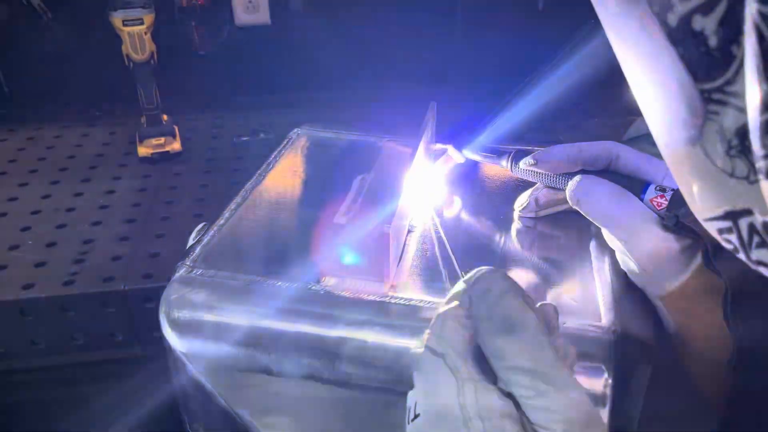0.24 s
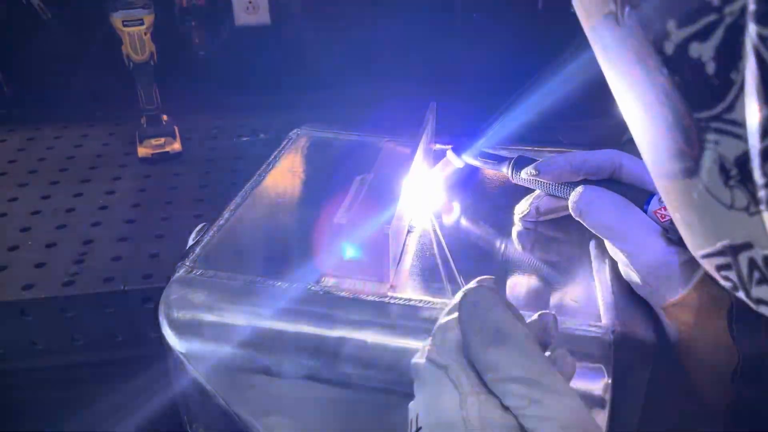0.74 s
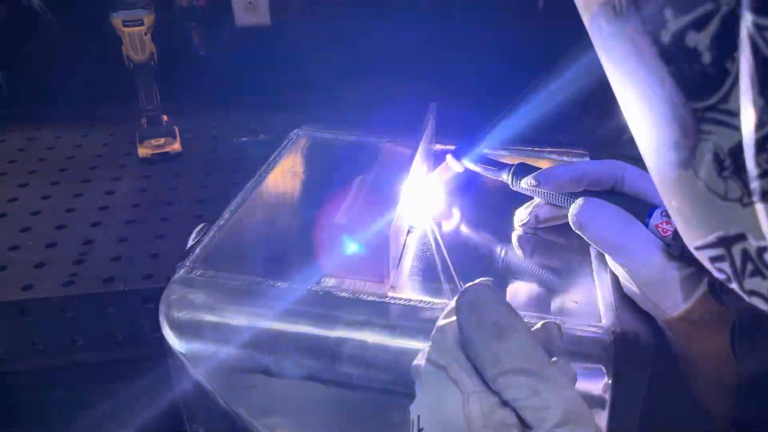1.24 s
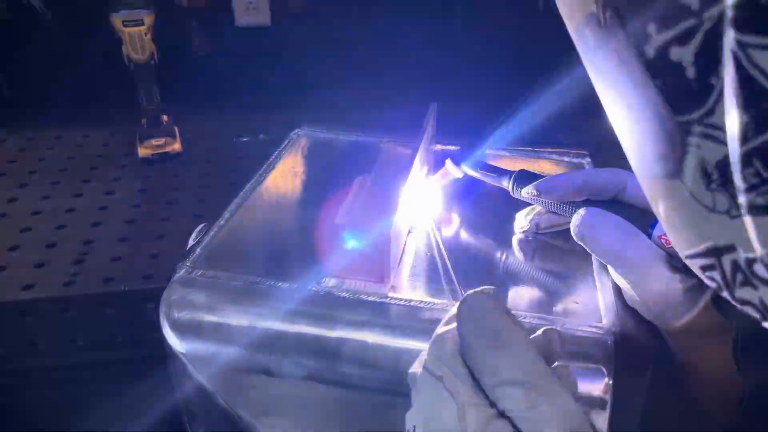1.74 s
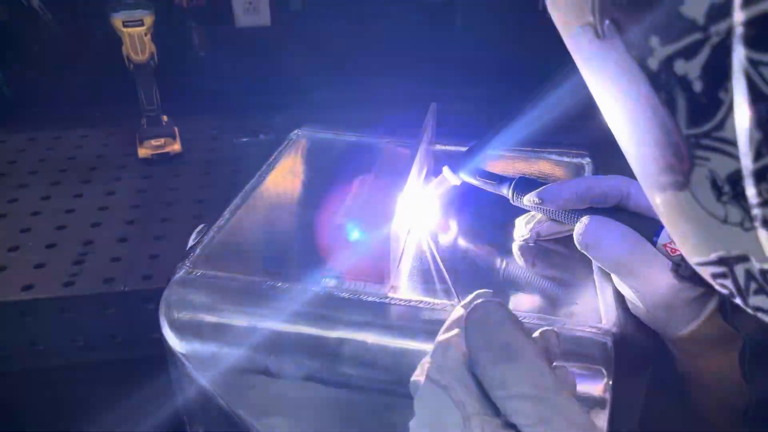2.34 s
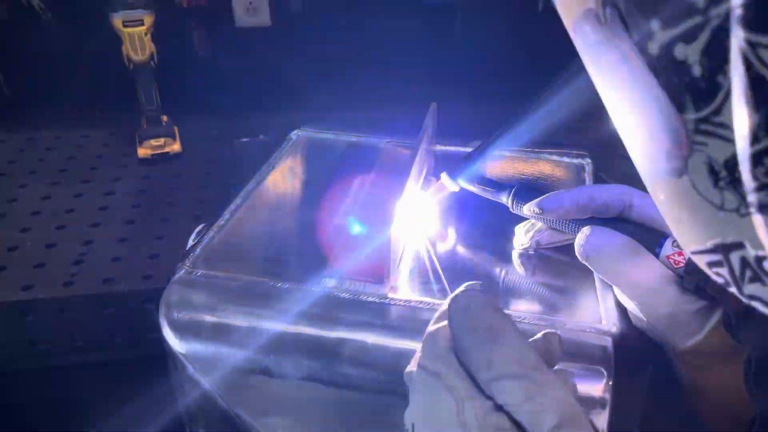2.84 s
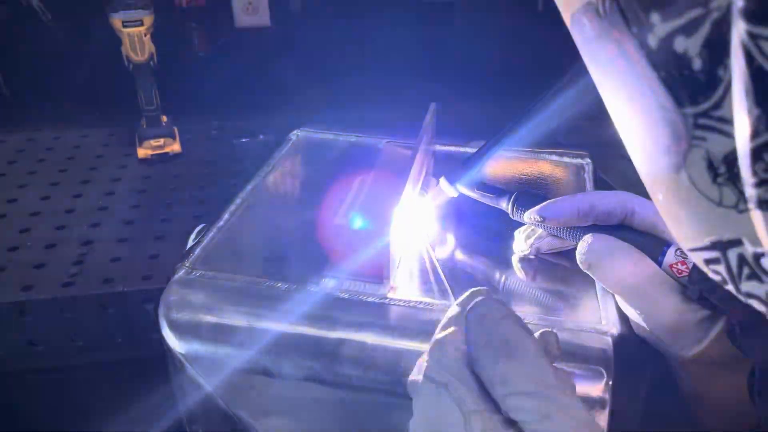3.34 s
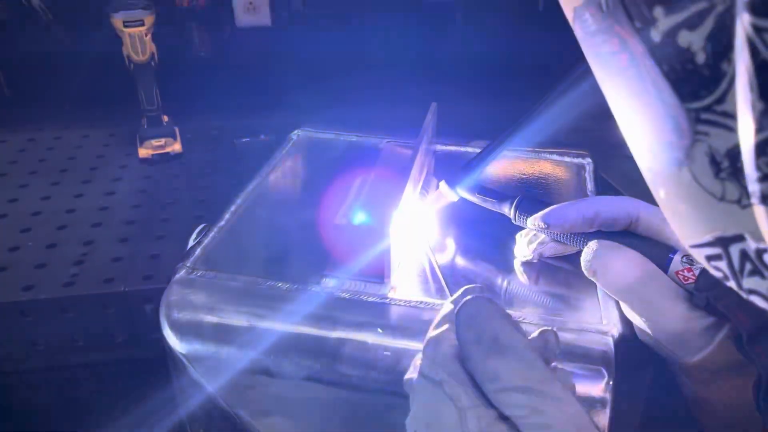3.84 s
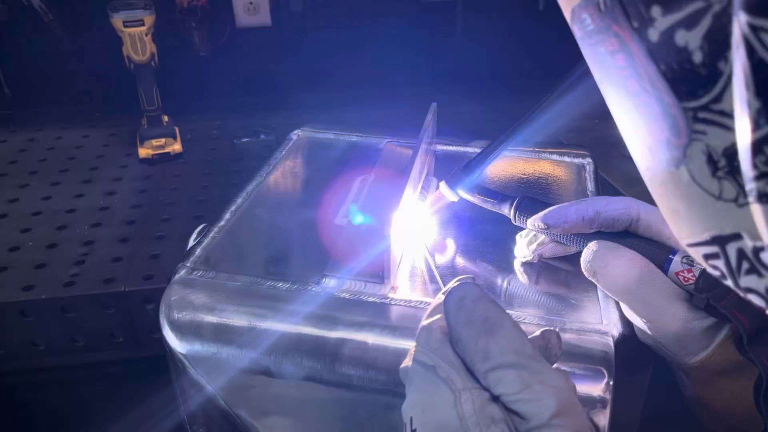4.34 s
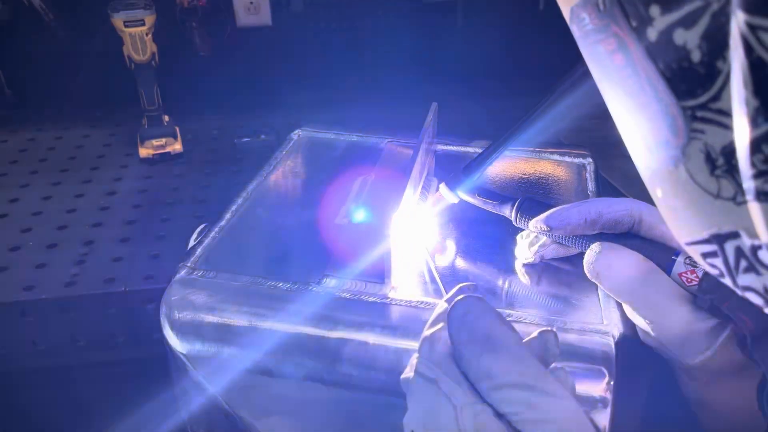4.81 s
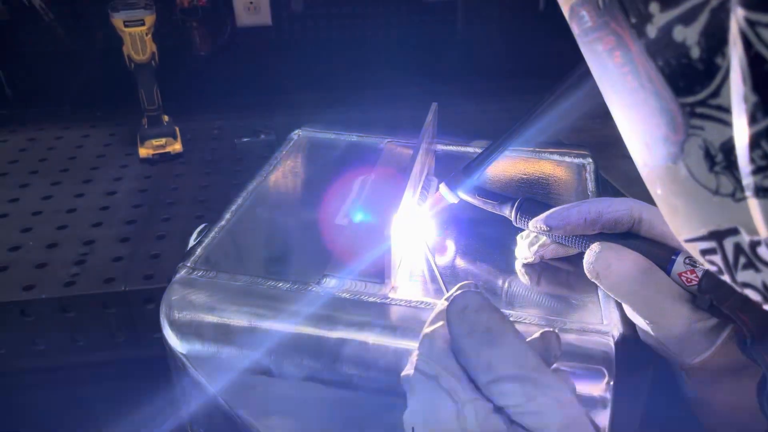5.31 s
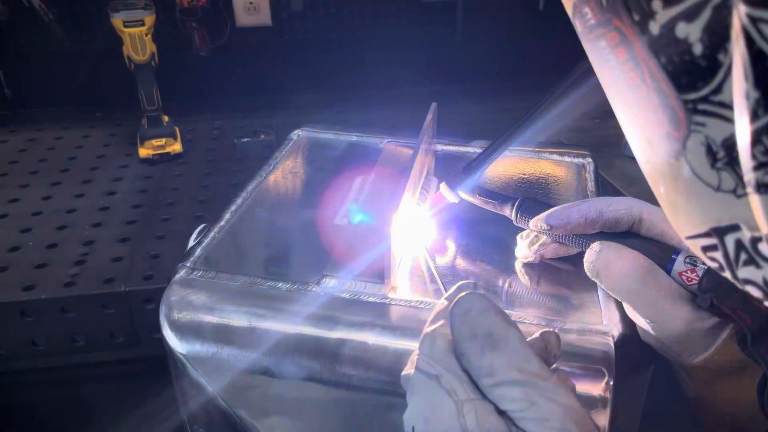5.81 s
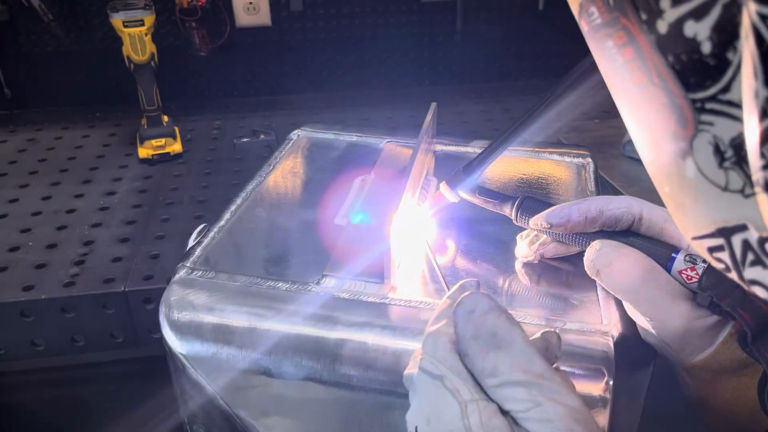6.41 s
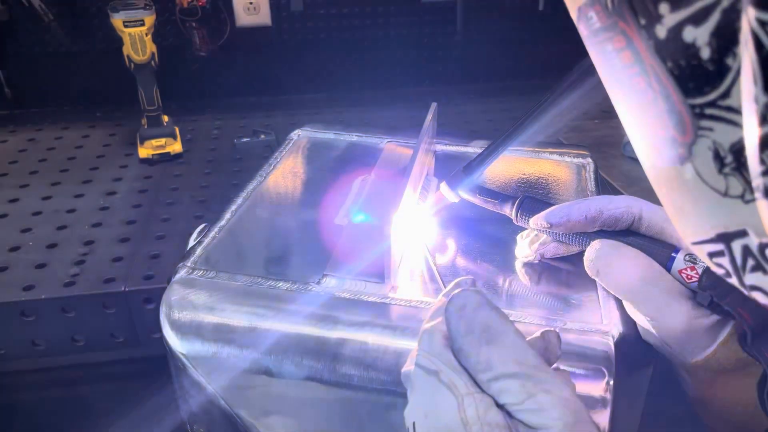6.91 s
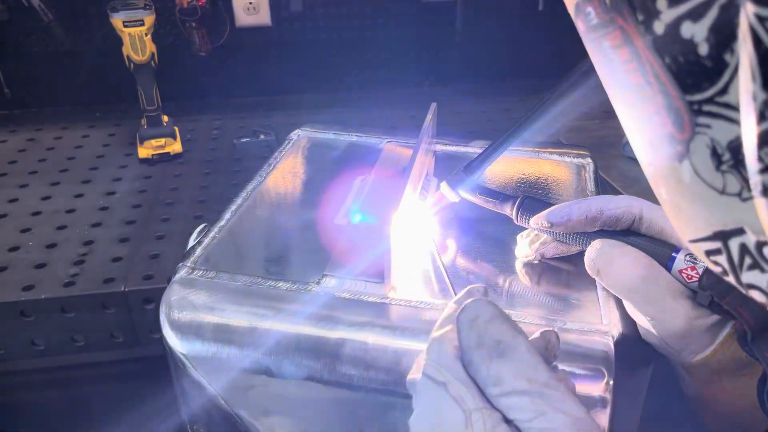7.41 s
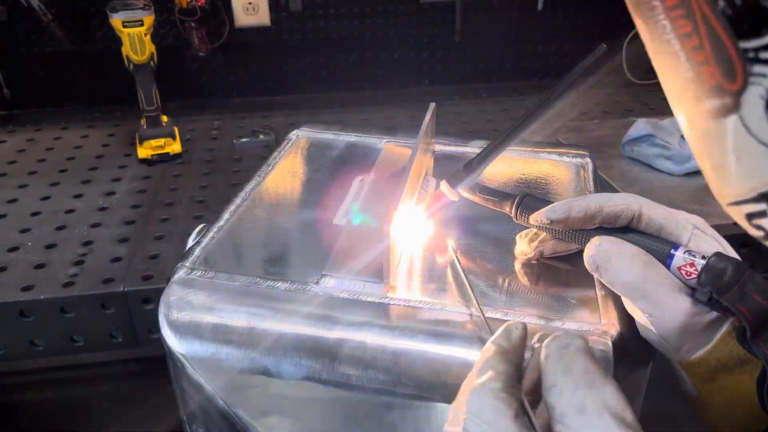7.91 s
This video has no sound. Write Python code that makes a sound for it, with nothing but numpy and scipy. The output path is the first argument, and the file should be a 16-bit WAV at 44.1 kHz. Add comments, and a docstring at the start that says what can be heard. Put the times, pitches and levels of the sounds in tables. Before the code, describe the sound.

Close to the microphone in a workshop, a welding arc gives a tight, bright, continuous buzz, sped up like a time-lapse, with a quick pulsing ripple. Almost halfway through it suddenly becomes a slower, louder, rasping buzz with metallic ring and hiss. Later it grows uneven, with crackles, hollow pops and a low airy roar, then collapses into dull thumps and thin pips over fan and gas noise.

```python
"""You hear a welding arc, close up: a fast buzz, then a slower, harsher one that sputters and dies away.
The arc welds an aluminium box in a workshop on alternating current. Twice a cycle the current reverses
and the arc snaps (a pressure step, coloured by the box); between the snaps it hisses (coloured noise).
The first stretch runs seven times faster, like a time-lapse; the rest is at natural speed.
Dull thumps, hollow pops and thin pips come late; fans, gas flow, machine tones and a roar lie behind."""
import sys
import numpy as np
from scipy import signal
from scipy.fft import rfft, irfft, next_fast_len
from scipy.io import wavfile
from scipy.ndimage import uniform_filter1d

SR = 44100
rng = np.random.default_rng(int(sys.argv[2]) if len(sys.argv) > 2 else 0)


def pcm_store(signal):
    """Save signal as 16-bit PCM."""
    levels = np.round(np.clip(np.atleast_2d(signal), -1, 1) * 32767)
    wavfile.write(sys.argv[1], SR, levels.astype(np.int16).T)


N = 359856
T = np.arange(N) / SR  # time of each sample, s

# Levels of the fast arc before the rod's dabs ripple them. Each row: start in seconds, then in dB
# the lead snap, the hiss, the crack of the main snap, its ring in the box, its hum.
FAST_LEVELS = [(0, -31, -43, -29, -38.5, -66), (.6, -34, -42.5, -27.5, -40, -68.5),
               (1.3, -37, -41.5, -28, -41, -62), (1.7, -39, -42, -29.5, -42, -62),
               (1.95, -35, -41.5, -29, -41.5, -67), (2.5, -39, -41, -29.5, -39.5, -58),
               (3.761, -36.5, -41, -30, -40, -58.5)]
# Levels of the arc at natural speed. Each row: the same columns as for the fast arc.
SLOW_LEVELS = [(3.765, -32, -35, -30.5, -39, -58), (3.8, -28.5, -34, -24, -29.5, -59),
               (4.3, -25, -34, -24, -30.5, -57.5), (4.7, -27, -31.5, -23, -28.5, -55),
               (5.1, -26, -32, -24.5, -30.5, -57), (5.45, -23.5, -32, -23, -28.5, -56),
               (5.8, -27.5, -30.5, -24, -33, -69), (6.1, -28.5, -27.5, -27, -36.5, -73),
               (6.4, -32.5, -33.5, -25, -36.5, -76), (6.65, -29, -30, -26.5, -34, -69),
               (6.9, -28.5, -29.5, -26, -32.5, -64), (7.3, -26, -33, -24.5, -31, -69),
               (7.55, -25.5, -28.5, -26, -29, -60), (7.7, -36.5, -28, -28.5, -41.5, -68),
               (7.88, -34.5, -37, -35, -36, -70), (8.0, -36, -41, -45, -44, -68),
               (8.104, -38, -42, -35, -35, -76)]
# How box and room colour the fast arc. Each row: multiple of the cycle rate, level in dB.
FAST_BOX_COLOUR = [(1, -17), (2, -16), (3, -16.5), (4, -24.8), (5, -10.5), (6, -10.5), (7, -14), (8, -21.5),
                   (9, -12.5), (10, -16), (11, -10.1), (12, -15.5), (13, -15), (14, -13), (15, -7.5),
                   (16, -14), (17, -15.5), (18, -11.5), (19, -8), (20, -2.5), (21, -5.5), (22, -0.5),
                   (23, 3.5), (24, 1), (25, -0.5), (26, 1.5), (27, 1.5), (28, 6.5), (29, 2.5), (30, -2),
                   (31, -1), (32, 6), (33, -4), (34, -4)]
# How they colour the arc at natural speed. Each row: multiple of the cycle rate, level in dB.
SLOW_BOX_COLOUR = [(1, -29), (2, -15.5), (3, -16), (4, -20), (5, -9), (6, -10), (7, -15.5), (8, -22.5),
                   (9, -11), (10, -16.5), (11, -13), (12, -21), (13, -14), (14, -16.5), (15, -10),
                   (16, -21.5), (17, -10), (18, -11.5), (19, -8), (20, -3), (21, -5.5), (22, -2), (23, 1.5),
                   (24, -1), (25, 0), (26, 1), (27, -3), (28, 3), (29, -2), (30, -1), (31, 1), (32, 3.5),
                   (33, 1.5), (34, 3.5), (35, -1.5), (36, 0)]
# Colour of the snaps above those multiples. Each row: frequency in Hz, level in dB.
CRACK_COLOUR = [(2500, -3), (2900, -6), (3300, -15.5), (4000, -10), (5500, -14), (6200, -9.5), (7000, -6.5),
                (8000, -9.5), (9000, -9), (10700, -16.5), (11600, -28), (12500, -27), (14000, -23),
                (15800, -37)]
# Colour of the lead snap on top of the main snap's. Each row: frequency in Hz at natural speed, dB.
LEAD_COLOUR = [(300, -31), (800, -13), (1200, -2.5), (2000, -6.5), (3000, -5.5), (4500, -2.5), (7000, 3.5),
               (8500, 6), (10000, 3.5), (12500, 8), (15800, 4)]
# Colour of the hiss. Each row: frequency in Hz at natural speed, level in dB.
HISS_COLOUR = [(60, -25.5), (300, -9.5), (900, -14), (2000, -2), (3200, -14), (4200, -6.5), (5300, -1.5),
               (6600, 2), (8000, -5.5), (10000, -4), (12000, -19), (15800, -25)]
# Steady gas fizz that follows the hiss level. Each row: frequency in Hz at natural speed, dB before a lift.
FIZZ_COLOUR = [(300, -33.5), (2000, -7), (6000, -13.5), (10000, -27), (13000, -18), (15800, -26)]
# Echoes off box walls and table top. Each row: delay in seconds at natural speed, level in dB,
# signed factor that multiplies it.
WALL_ECHOES = [(.0013, -24.5, 0.66), (.0022, -24, -0.89), (.0036, -37, -0.37), (.0055, -26.5, -0.00046),
               (.0063, -27, -1), (.0076, -16.5, 0.46), (.0091, -28.5, -1.16)]
# How unsteady the arc is. Each row: time in seconds, factor on the scatter of the snaps.
UNSTEADINESS = [(3.76, 1.2), (5.7, 1.1), (6.1, 1.9), (6.5, 1.7), (6.8, 2.6), (7.05, 2.2), (7.3, 1.5),
                (7.6, 1.8), (8.1, 2.5)]
# Brief dips of the main snap and hiss. Each row: time in seconds, depth in dB, width in seconds.
ARC_DIPS = [(4.21, -6, 0.014), (5.01, -2, 0.022), (6.28, -4, 0.012), (7.015, -3.5, 0.032)]
# Single snaps louder than their neighbours. Each row: time in seconds, lift in dB.
SNAP_FLARES = [(3.9745, 6), (4.1875, 6.5), (5.8004, 1), (6.5459, 7), (6.6564, 5), (6.7021, 2), (6.763, 4),
               (6.8655, 1), (6.9415, 8), (6.9872, 8), (7.5542, 3.5), (7.6911, 4.5), (7.8128, 4),
               (7.8737, 7), (8.0106, 10)]
# Top treble of the arc. Each row: time in seconds, change in dB.
TOP_TREBLE = [(5.5, -3), (6.3, -4.5), (7.55, -3.5), (7.82, -10), (8.05, -2)]
# A narrow hollow in the arc's sound. Each row: time in seconds, share taken away.
HOLLOW_SHARE = [(5.4, 0), (5.8, 0.51)]
# Ripple from the rod's dabs. One entry each for lead snap, hiss, crack, ring, hum: swing in dB.
DAB_SWING_DB = [1.1, .5, 0.78, 0.8, 1.8]
# How late each of these ripples comes. One entry each, in the same order: lag in turns of the rhythm.
DAB_LAG_TURNS = [0, .1, .13, -.1, -.3]
# Dull thumps of the dying arc. Each row: time in seconds, level in dB.
THUMP_LEVEL = [(7.5, -54), (7.85, -39.5), (7.9, -33), (7.95, -34.5), (8.0, -31), (8.05, -27), (8.1, -29.5)]
# Colour of the thumps. Each row: frequency in Hz, level in dB.
THUMP_COLOUR = [(60, -25), (150, -10.5), (400, 3), (1200, -3), (2000, -4.5), (2650, -26), (3300, -6),
                (4900, -5.5), (6100, -28), (7600, -11), (9000, -30), (12000, -38)]
# Thin pips at the end. Each row: time in seconds, size in dB before a random spread.
PIP_SIZE = [(7.98, -40), (8.0, -26), (8.024, -28), (8.05, -28), (8.07, -24), (8.09, -29), (8.102, -25)]
# Hollow pops of the sputtering pool. Each row: time in seconds, size in dB.
POPS = [(5.9222, -17), (5.9983, -14), (6.0135, -19), (6.0439, -16), (6.0591, -18), (6.1048, -16),
        (6.12, -17), (6.1504, -16), (6.1808, -16), (6.2417, -16), (6.2874, -17.5), (6.6069, -13),
        (6.6373, -13), (6.6525, -14), (6.6986, -14), (6.759, -15), (7.5654, -17), (7.5803, -16),
        (7.6415, -18), (7.702, -22), (7.762, -19), (7.9, -16), (7.9152, -20), (7.9458, -15.5)]
# Colour of fans and gas flow at natural speed. Each row: frequency in Hz, dB per Hz, relative.
SHOP_COLOUR = [(35, -39), (60, -25), (103, -7.5), (563, -4.5), (780, -8.5), (856, 5.5), (919, -15),
               (1080, -0.5), (2690, -3.5), (6360, -6), (15800, -19)]
# Loudness of that air noise. Each row: time in seconds, level in dB.
SHOP_LEVEL = [(3.764, -56), (3.79, -42), (6, -39.5), (6.4, -43.5), (7.6, -40), (7.9, -36.5), (8.05, -33.5),
              (8.16, -40)]
# Colour of the air noise in the fast stretch. Each row: frequency in Hz, dB per Hz, relative.
FAST_SHOP_COLOUR = [(18, -63), (30, -58), (395, -18.5), (456, -22), (752, -31), (910, -12.5), (1610, -13),
                    (2480, -7.5), (3460, -16.5), (9000, -2), (11700, -14), (19800, -120)]
# Machine tones, before each stretch shifts their pitch and the slow one their level.
# Each row: frequency in Hz, rms level in dB.
MACHINE_TONES = [(119.97, -65), (273.7, -60), (359.9, -48), (1728, -56), (1859.6, -65), (2057, -60)]
# Colour of the low roar. Each row: frequency in Hz, dB per Hz, relative.
ROAR_COLOUR = [(40, -40), (100, -15.5), (250, -1), (400, -2), (800, -6.5), (1300, -7), (2500, -32),
               (5000, -70)]
# Loudness of the roar. Each row: time in seconds, level in dB.
ROAR_LEVEL = [(3.77, -58), (5.6, -59), (6.1, -41.5), (6.65, -43.5), (6.95, -51), (7.5, -52), (7.6, -41.5),
              (7.85, -39.5), (8.0, -36), (8.1, -36), (8.13, -35), (8.16, -35)]

CYCLE_HZ = 65.7225  # current cycles a second at natural speed
HURRY = 7  # speed of the fast stretch
POSITIVE_SHARE = .267  # part of each cycle with the electrode positive
TOP_HZ = 15850  # nothing passes above
BASS_DB, BASS_FOLLOWS = -10.5, 0.82  # bass under the ring, and how far it follows the ring's changes
# Dips of the filler rod a second at the start, their gain in Hz a second, start of the count in turns
DAB_HZ, DAB_QUICKENS, DAB_TURNS = 6.29, .32, .2
DAB_SETTLES_S = 1.5  # the rhythm grows to full depth
TICK_DB, TICK_LAG_TURNS = -26, 0.37  # a bare tick that swings with the dabs
TICK_LOW_HZ, TICK_HIGH_HZ = 2820, 8950  # band of the tick
HOLLOW_HZ, HOLLOW_WIDTH_HZ = 3340, 160


def slow_pass():
    """Natural speed: the bass rides under the ring of the box, and a narrow hollow opens in the buzz."""
    lead, hiss, crack, ring, hum = gains(SLOW_LEVELS)
    bass = amp(BASS_DB) * ring * (ring / ring.max()) ** (BASS_FOLLOWS - 1)
    levels = [lead, hiss, crack, ring, bass, hum]
    buzz = arc(levels, SLOW_BOX_COLOUR, 3.76138, 1, edges_hz=[3300, 1200, 97])
    hollow = filtered(buzz, lambda hz: np.exp(-((hz - HOLLOW_HZ) / HOLLOW_WIDTH_HZ) ** 2))
    return buzz - curve(HOLLOW_SHARE) * hollow


def fast_pass():
    """The hurried stretch: every dab of the rod makes the levels ripple, and a bare tick swings along."""
    turns = DAB_TURNS + DAB_HZ * T + DAB_QUICKENS * T ** 2 / 2
    depth = np.minimum(T / DAB_SETTLES_S, 1)
    levels = []
    for gain, db, lag in zip(gains(FAST_LEVELS), DAB_SWING_DB, DAB_LAG_TURNS):
        ripple_db = db * depth * np.cos(2 * np.pi * (turns - lag))
        levels.append(gain * amp(ripple_db))
    buzz = arc(levels, FAST_BOX_COLOUR, .00153, HURRY, edges_hz=[8400, 680])

    times = np.arange(.0021, FAST_LEVELS[-1][0], 1 / (CYCLE_HZ * HURRY))
    swing = depth * np.cos(2 * np.pi * (turns - TICK_LAG_TURNS))
    tick = pulses(times, np.ones(len(times))) * amp(TICK_DB) * swing
    tick = filtered(tick, lambda hz: 1 / (1 + (TICK_LOW_HZ / (hz + 1)) ** 6 + (hz / TICK_HIGH_HZ) ** 6))
    return buzz + tick


def arc(levels, box, start, speed, edges_hz):
    """Each cycle has a lead snap, a hissing half-wave and a main snap split into bands, crack to hum."""
    lead_gain, hiss_gain, *main_gains = levels
    on = lead_gain > amp(-150)
    cycle_hz = CYCLE_HZ * speed
    order, order_db = np.transpose(box)

    def main_colour(hz):
        low_db = np.interp(hz / cycle_hz, np.r_[0, order], np.r_[-60, order_db])
        return np.where(hz < order[-1] * cycle_hz, low_db, along(CRACK_COLOUR, hz))

    def lead_colour(hz):
        return main_colour(hz) + along(LEAD_COLOUR, hz / speed)

    dips_db = sum(db * np.exp(-((T - s) / width) ** 2) for s, db, width in ARC_DIPS)
    dips = amp(dips_db)

    # The main snap: each band is what one low-pass lets through and the next one does not
    main = snap(start + POSITIVE_SHARE / cycle_hz, speed, 0.73, 1e-5, 0.13, 0.00047)
    main = near_wall(causal(main, main_colour), speed, 5.2)
    below = [filtered(main, lambda hz: 1 / (1 + (hz / edge) ** 12)) for edge in edges_hz]
    uppers, lowers = [main] + below, below + [0]
    bands = [on * dips * gain * unit(a - b) for a, b, gain in zip(uppers, lowers, main_gains)]
    crack, low_bands = bands[0], bands[1:]

    lead = snap(start, speed, 2.0, 1.5e-5, 0.6, 0.00044)
    lead = near_wall(causal(lead, lead_colour), speed, 4.7)
    snaps = flares() * (crack + lead_gain * below_top(lead))

    # Hiss: loud between lead and main snap, faint otherwise, with a quick random flicker
    burning = ((T - start) * cycle_hz) % 1 < POSITIVE_SHARE
    flicker = amp(1.9 * unit(uniform_filter1d(rng.standard_normal(N), 28 // speed)))
    hiss = flicker * rng.standard_normal(N) * (burning + 0.12) * dips
    hiss = causal(hiss, lambda hz: along(HISS_COLOUR, hz / speed))
    fizz = causal(rng.standard_normal(N), lambda hz: along(FIZZ_COLOUR, hz / speed))
    sharp = snaps + on * hiss_gain * (below_top(hiss) + amp(5.0) * fizz)

    # The top treble changes over time and is dullest just before the end
    treble = filtered(sharp, lambda hz: 1 / (1 + (9600 * speed / (hz + 1)) ** 10))
    sharp = sharp + (amp(curve(TOP_TREBLE)) - 1) * treble
    return sum(low_bands) + box_walls(sharp, speed)


def snap(start, speed, scatter_db, jitter_s, rough, burst_s):
    """One pressure step a cycle, smeared by a short burst of sputter as the arc root finds its place."""
    times = np.arange(start % (1 / CYCLE_HZ), N / SR, 1 / (CYCLE_HZ * speed))
    # Snaps miss more than they overshoot
    chance = np.clip(rng.standard_normal((len(times), 2)), -2.2, 1.4)
    loose = np.interp(times, *np.transpose(UNSTEADINESS))
    sizes = amp(chance[:, 0] * scatter_db * loose)
    step = pulses(times + chance[:, 1] * loose * jitter_s / speed, sizes)
    fade = np.exp(-np.arange(200) * speed / (burst_s * SR))
    burst = signal.fftconvolve(step, fade / np.linalg.norm(fade))[:N]
    sputter = rng.standard_normal(N) * burst
    sputter = sputter * np.interp(T, times, loose)  # an unsteady arc sputters more
    return rough * filtered(sputter, lambda hz: hz / speed > 2300) - step


def flares():
    """Single snaps flare up: a gain that rises for about three thousandths of a second at each."""
    db = np.zeros(N)
    for s, lift_db in SNAP_FLARES:
        db[round((s - .001) * SR):round((s + .002) * SR)] = lift_db
    return amp(uniform_filter1d(db, 20))


def near_wall(x, speed, db):
    """The upright plate beside the arc throws the snap back a fraction of a millisecond later."""
    return filtered(x, lambda hz: 1 + amp(db) * np.exp(-2j * np.pi * hz * 0.00018 / speed))


def box_walls(x, speed):
    """The box walls and table top send back delayed copies of the higher frequencies."""
    def response(hz):
        echoes = sum(sign * amp(db) * np.exp(-2j * np.pi * hz * s / speed) for s, db, sign in WALL_ECHOES)
        return 1 + (hz / speed > 2400) * echoes
    return filtered(x, response)


def dying_arc():
    """Late sounds of the arc: a dull thump each cycle, hollow pops of the pool and a fast row of pips."""
    times = np.arange(3.7608, N / SR, 1 / CYCLE_HZ)
    blows = pulses(times, amp(rng.normal(0, 1.3, len(times))))
    thumps = gains(THUMP_LEVEL)[0] * unit(causal(blows, lambda hz: along(THUMP_COLOUR, hz)))

    t = np.arange(SR // 200) / SR
    times = np.arange(7.9825, PIP_SIZE[-1][0], .005815)
    sizes = amp(np.interp(times, *np.transpose(PIP_SIZE)) + rng.normal(0, 3, len(times)))
    pip = np.sin(2 * np.pi * 10100 * t) * np.exp(-((t - .001) / 0.00086) ** 2)
    pips = signal.fftconvolve(pulses(times, sizes), pip)[:N]

    # The box rings briefly at each pop
    pop = np.sin(2 * np.pi * 1850 * t) * 1.8 * np.exp(-t / 0.00057) * (1 - np.exp(-t / .0001))
    pop = pop - pop.mean()
    times, db = np.transpose(POPS)
    return thumps + pips + signal.fftconvolve(pulses(times, amp(db)), pop)[:N]


def workshop():
    """Fans and gas flow as coloured noise, machine tones as sines; a low roar swells in later."""
    fast_air = amp(-49.0) * air(FAST_SHOP_COLOUR)
    fast = (T < FAST_LEVELS[-1][0]) * (fast_air + machine_tones(HURRY))
    slow_tones = (T > SLOW_LEVELS[1][0]) * amp(-2.0) * machine_tones(0.99)
    roar = gains(ROAR_LEVEL)[0] * air(ROAR_COLOUR)
    return fast + slow_tones + roar + gains(SHOP_LEVEL)[0] * air(SHOP_COLOUR)


def machine_tones(speed):
    """Machines hum as steady sine waves, whose pitch moves with the playing speed."""
    return sum(np.sqrt(2) * amp(db) * np.sin(2 * np.pi * hz * speed * T) for hz, db in MACHINE_TONES)


def air(colour):
    """Rushing air is random noise, shaped by a colour table and set to an rms of one."""
    return unit(filtered(rng.standard_normal(N), lambda hz: amp(along(colour, hz))))


def amp(db):
    """Turn dB into a plain factor."""
    return 10 ** (np.asarray(db) / 20)


def unit(x):
    """Scale a sound to an rms of one."""
    return x / np.sqrt(np.mean(x ** 2) + 1e-20)


def curve(points):
    """Join (seconds, value) points by straight lines, one value per sample."""
    return np.interp(T, *np.transpose(points))


def along(points, hz):
    """Join (Hz, value) points by straight lines on a log frequency axis."""
    f, v = np.transpose(points)
    return np.interp(np.log(hz + 1), np.log(f + 1), v)


def gains(rows):
    """Gain per sample for each dB column; the first is silent outside the table."""
    s, first, *rest = np.transpose(rows)
    return [amp(np.interp(T, s, first, -200, -200))] + [amp(np.interp(T, s, c)) for c in rest]


def filtered(x, response):
    """Multiply the spectrum of x by a response that depends on frequency."""
    m = next_fast_len(N + 8192)
    return irfft(rfft(x, m) * response(np.fft.rfftfreq(m, 1 / SR)), m)[:N]


def below_top(x):
    """Cut a sound off at the band limit and scale it to an rms of one."""
    return unit(filtered(x, lambda hz: hz < TOP_HZ))


def causal(x, db_of):
    """Colour x without any sound ahead of its cause (minimum phase, by folding the cepstrum)."""
    size = 4096
    cepstrum = irfft(np.log(amp(db_of(np.fft.rfftfreq(size, 1 / SR)))), size)
    cepstrum[1:size // 2] *= 2
    cepstrum[size // 2 + 1:] = 0
    return signal.fftconvolve(x, irfft(np.exp(rfft(cepstrum)), size))[:N]


def pulses(times, sizes):
    """Place clicks at exact times, even between samples, with short windowed sinc shapes."""
    at = times[:, None] * SR
    k = np.floor(at) + np.arange(-7, 9)
    tap = np.sinc(k - at) * np.cos(np.pi * (k - at) / 16) ** 2 * sizes[:, None]
    return np.bincount(np.clip(k, 0, N).astype(int).ravel(), tap.ravel(), N + 1)[:N]


def scene():
    """Add the arc at both speeds, its dying sounds and the workshop."""
    return (fast_pass() + slow_pass() + dying_arc() + workshop())[None]


def record(dry):
    """The converter rounds off the highest peaks; nothing passes above the band limit."""
    soft = dry[0] / (1 + abs(dry[0] / .99) ** 6) ** (1 / 6)
    return filtered(soft, lambda hz: hz < TOP_HZ)[None]


dry = scene()
out = record(dry)
pcm_store(out)
```